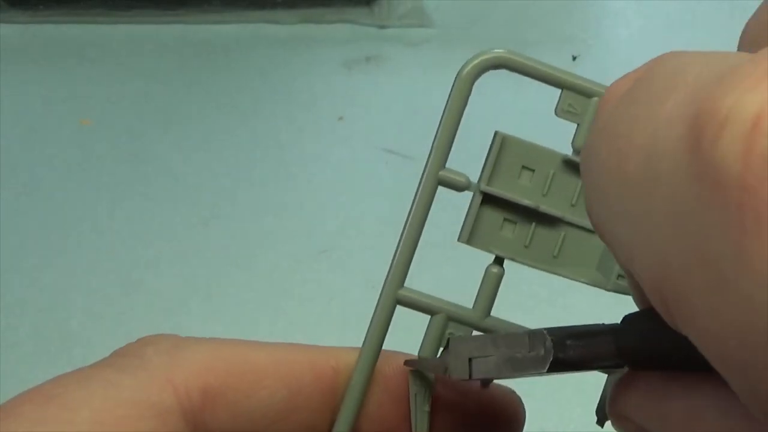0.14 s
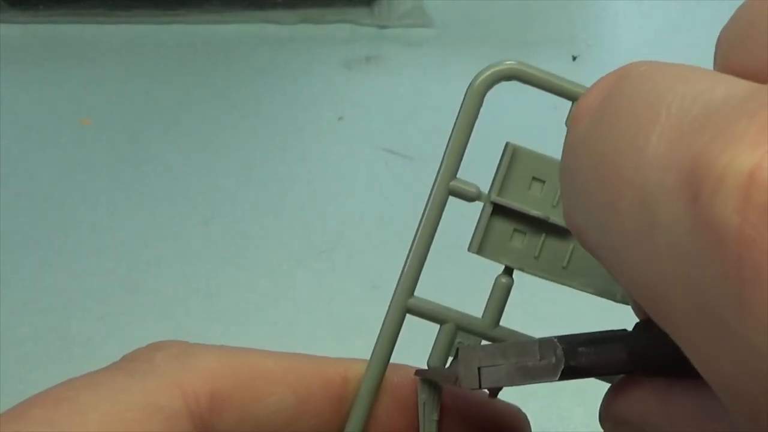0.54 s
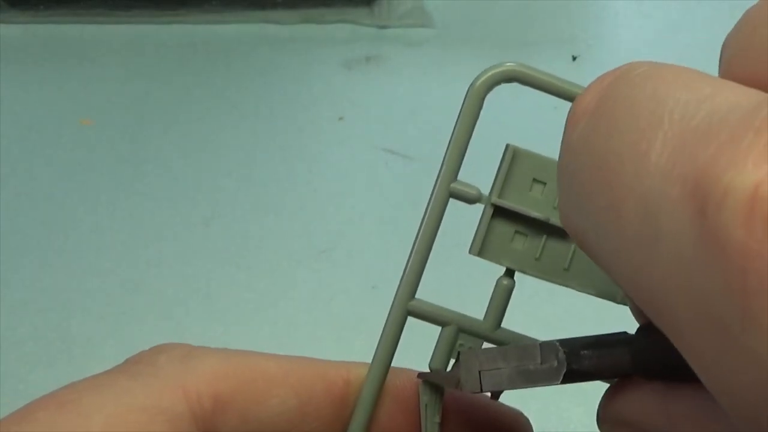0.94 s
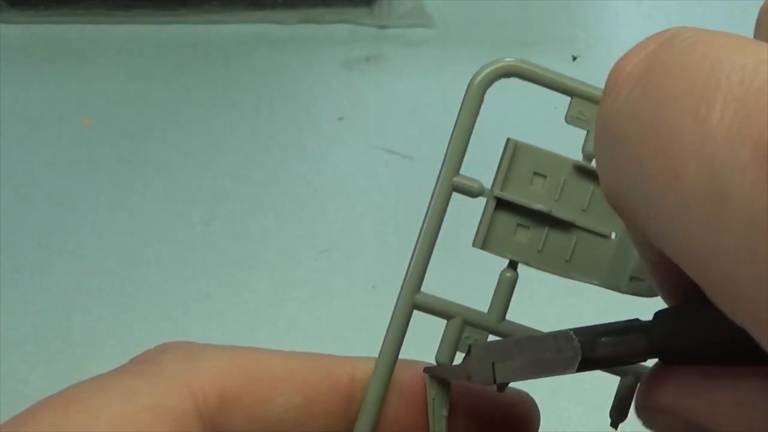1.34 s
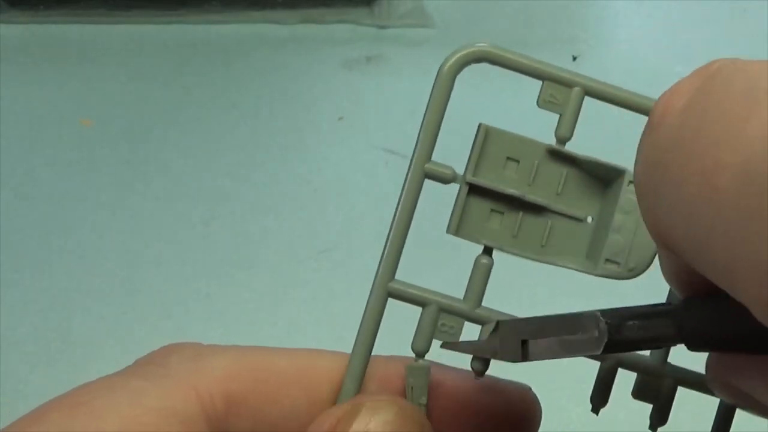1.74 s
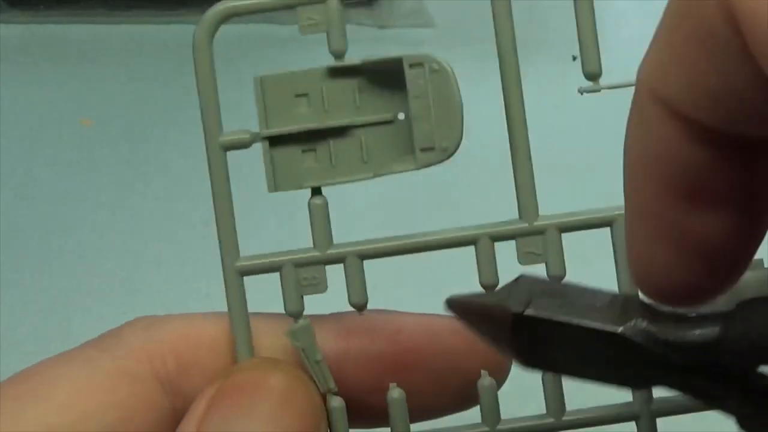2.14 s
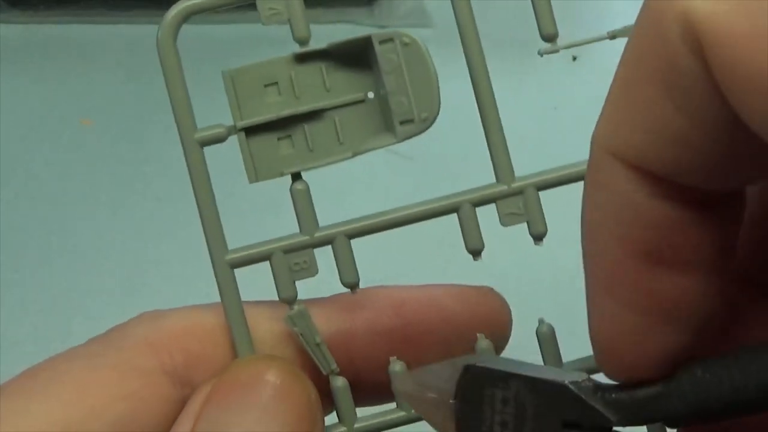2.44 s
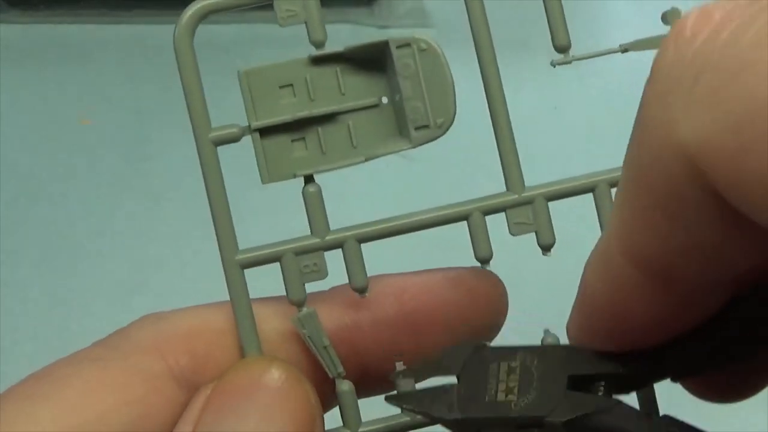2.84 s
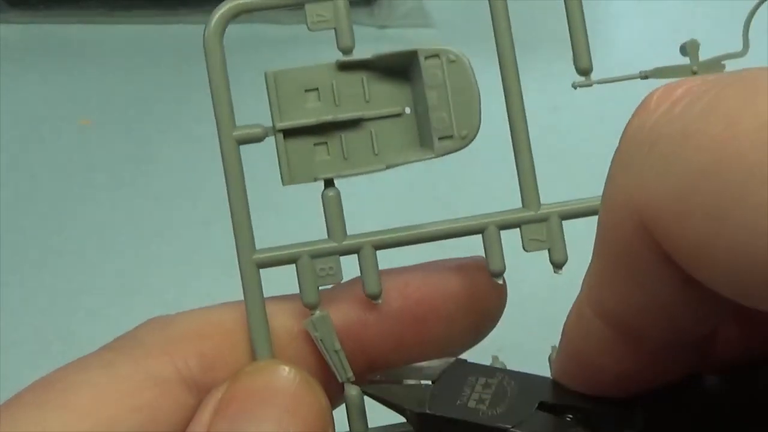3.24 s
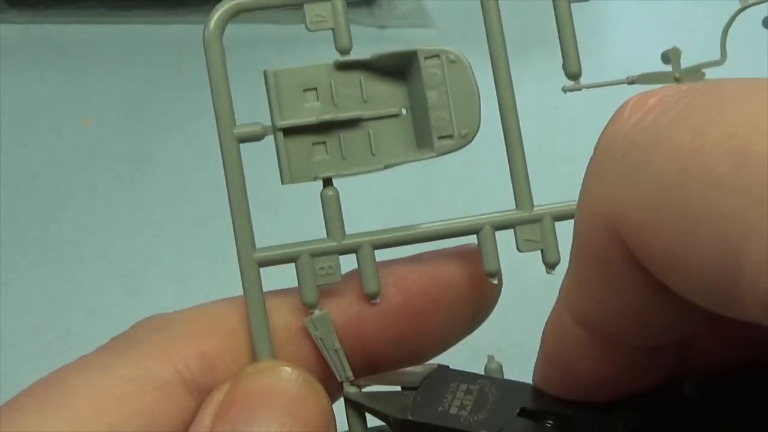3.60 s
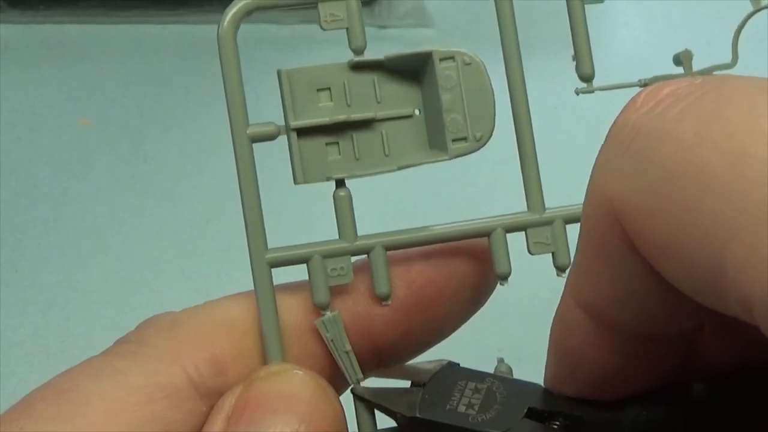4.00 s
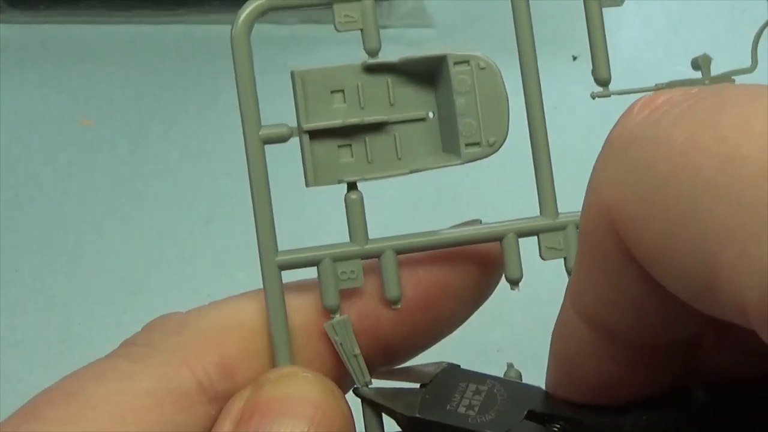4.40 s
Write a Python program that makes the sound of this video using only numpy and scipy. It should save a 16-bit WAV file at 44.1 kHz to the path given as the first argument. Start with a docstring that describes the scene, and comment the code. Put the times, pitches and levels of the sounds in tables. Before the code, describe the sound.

Close cutters crack thin plastic in hard bright clicks, then mostly quiet with light scrapes, a late small snap, faint motor pips and hiss.

```python
"""Side cutters snap the gates of a plastic model frame just in front of a camera in a quiet room.
Snaps are impulses and decaying noise through resonances; steel jaws tick as damped modes; scrapes and
finger rustle are fluctuating filtered noise; dull knocks are damped sines. A diffuse tail follows.
Underneath are the focus motor's tone pips, shaped hiss, a wandering low murmur and mains hum."""
import sys
import numpy as np
from scipy import signal
from scipy.fft import rfft, irfft
from scipy.io import wavfile
from scipy.ndimage import uniform_filter1d

SR = 44100
rng = np.random.default_rng(int(sys.argv[2]) if len(sys.argv) > 2 else 0)


def to_linear_factor(level_db):
    """Convert decibel levels (scalar or array-like) to linear amplitude factors."""
    exponent = np.asarray(level_db, float) / 20
    return 10 ** exponent


def dump(signal):
    """Clip the signal to [-1, 1] and save it as 16-bit WAV at the path in sys.argv[1]."""
    limited = np.clip(np.atleast_2d(signal).T, -1, 1)
    pcm = np.round(limited * 32767).astype(np.int16)
    wavfile.write(sys.argv[1], SR, pcm)


N = 201051
T = np.arange(N) / SR


def level(x, db):
    """Root-mean-square scaling: all rows together get the rms level db."""
    return x * to_linear_factor(db) / np.sqrt(np.mean(x ** 2))


def band(x, hz, width):
    """Two-pole resonance of the given bandwidth in Hz, with unit gain at its centre."""
    return signal.lfilter(*signal.iirpeak(hz, hz / width, SR), x)


def ring(force, modes, detune):
    """Modal superposition: each damped mode is a complex pole, a little off its pitch for this blow."""
    out = 0
    for (hz, db, t60), pitch_ratio in zip(modes, detune):
        decay = np.log(1000) / (t60 * SR)
        pole = np.exp(2j * np.pi * hz * pitch_ratio / SR - decay)
        out = out + to_linear_factor(db) * signal.lfilter([1], [1, -pole], force).imag
    return out


def fade(t, t60):
    """Exponential decay by 60 dB in t60 seconds."""
    return np.exp(-np.log(1000) * t / t60)


def colour(points):
    """Spectral shaping of white noise by (Hz, dB) points joined along log frequency."""
    hz, db = np.transpose(points)
    f = np.maximum(np.fft.rfftfreq(N, 1 / SR), 1)
    gain = to_linear_factor(np.interp(np.log(f), np.log(hz), db))
    return irfft(rfft(rng.standard_normal(N)) * gain, N)


def walk(rate):
    """Slow random modulation: values 1 / rate s apart joined by straight lines, rms about 0.67."""
    k = int(SR / rate)
    held = np.repeat(rng.standard_normal(N // k + 1), k)
    return 0.82 * uniform_filter1d(held, k)[:N]


def add(out, s, db, sound):
    """Superposition: adds a sound starting at s seconds, scaled to the peak db."""
    i = int(s * SR)
    out[i:i + len(sound)] += (sound * to_linear_factor(db) / np.abs(sound).max())[:N - i]


def clicks():
    """Impulsive fracture: a gate parts in a sharp step and a trail of grit, and the frame's modes ring on."""
    # snaps and knocks of the plastic:
    # [t/s, relative peak level/dB, bright centre f/Hz, body centre f/Hz, body re bright/dB, grit t60/s]
    snaps = [(.3510, -35.5, 7500, 1920, 25, 0.0075), (.9450, -28, 8060, 2190, -0.5, 0.02),
             (1.282, -46, 8400, 2300, -6.5, 0.015), (1.5488, -12, 7700, 1960, -15, 0.012),
             (1.5855, -31, 7700, 2900, 8, 0.027), (1.5967, -31.5, 7160, 3130, -3, 0.032),
             (1.651, -40, 6300, 1820, -7, 0.028), (1.6635, -48, 7520, 3090, -13, 0.012),
             (1.724, -23.5, 7300, 3200, -4, 0.015), (1.7733, -31.5, 7400, 2220, 14, 0.023),
             (1.7792, -22, 6960, 3050, -1, 0.011), (2.0004, -47, 8900, 3020, 0, 0.018),
             (2.0365, -46.5, 8600, 2950, -6, 0.036), (2.2029, -19.5, 8400, 3700, -13, 0.084),
             (2.2165, -11, 7900, 3700, -31, 0.012), (2.2185, -10.5, 7970, 3820, -11, 0.041),
             (2.3042, -23, 8130, 3500, -14, 0.036), (2.376, -31.5, 7930, 3840, -8, 0.038),
             (3.8285, -39, 7500, 3540, -13, 0.014), (3.8737, -42.5, 7860, 3040, -8.5, 0.023),
             (3.9385, -45, 6450, 1680, 14, 0.075), (3.9805, -45, 7150, 3400, 16, 0.0084),
             (4.118, -51, 8240, 2980, -19, 0.013), (4.4299, -31.5, 6700, 3970, -3, 0.027)]
    # modes of the plastic frame: [f/Hz, relative level/dB, t60/s]
    frame_modes = [(3300, -26.5, 0.038), (3700, -26, 0.078), (4480, -17, .03), (5030, -13, 0.017),
                   (5190, -7.5, 0.028), (6484, -8.5, 0.042), (6444, -11, 0.025), (6700, -14, 0.042),
                   (7700, -24, 0.024), (7440, -35, .05), (8020, 3.5, 0.0067), (8710, -13.5, 0.026),
                   (8950, -20.5, 0.013), (10090, -16.5, 0.034)]
    out, t = np.zeros(N), T[:SR // 5]
    for s, db, bright_hz, body_hz, body_db, t60 in snaps:
        noise = rng.standard_normal((2, len(t)))
        roughness = to_linear_factor(9 * uniform_filter1d(noise[1], size=16))
        grit = fade(t, t60) * noise[0] * roughness
        # the step scales with the total energy of the grit
        step = 1.5 * np.sqrt(np.sum(grit ** 2) / 10) * (t == 0)
        force = grit + step
        bright = level(band(band(force, bright_hz, 2500), bright_hz, 4900), 0)
        # the body has a peak where it was struck over a broad plateau of overlapping modes
        peak = band(force, body_hz, 0.3 * body_hz)
        plateau = to_linear_factor(-11) * band(force, 0.7 * body_hz, 1.9 * body_hz)
        body = level(peak + plateau, body_db)
        detune = 1 + 0.011 * noise[1, :len(frame_modes)]
        frame = level(ring(force, frame_modes, detune), -8)
        add(out, s, db, bright + body + frame)
    # thin plastic radiates almost no bass
    return signal.lfilter(*signal.butter(2, 500, "high", fs=SR), out)


def ticks():
    """Impact excitation: a hard, very short touch rings the steel; where it lands sets the lowest mode."""
    # light touches of the steel jaws: [t/s, relative peak level/dB, added gain of the lowest mode/dB]
    touches = [(0.3586, -42.5, -3), (0.4616, -44.5, 3), (0.809, -44, 1), (1.337, -41.5, 4.5),
               (1.4776, -38.5, -1), (1.4944, -62, 3), (2.6762, -41.5, 6), (2.69, -55, -6),
               (3.8106, -40.5, -5)]
    # modes of the steel jaws, lowest first: [f/Hz, relative level/dB, t60/s]
    jaw_modes = [(4174, -4.5, 0.062), (6910, 6.5, 0.074), (7190, 11, 0.034), (8640, 5.5, 0.031),
                 (9320, 7, 0.06)]
    out, t = np.zeros(N), T[:SR // 4]
    for s, db, low_db in touches:
        noise = rng.standard_normal(len(t))
        touch = (t == 0) + 0.054 * noise * fade(t, 0.0085)
        detune = 1 + 0.0024 * noise[-len(jaw_modes):]
        lowest = to_linear_factor(low_db) * ring(touch, jaw_modes[:1], detune)
        higher = ring(touch, jaw_modes[1:], detune[1:])
        add(out, s, db, lowest + higher + 0.53 * touch)
    return out


def scrapes():
    """Friction: uneven slips of the jaws excite now one bright resonance, now another, and the frame's body."""
    # jaws sliding on the frame: [t of the envelope's top/s, relative level/dB, swell/s, fade/s,
    # body re bright at the top/dB]
    slides = [(1.19, -67.5, .05, 0.054, -18), (1.391, -64, .04, .04, -1), (1.709, -55.5, 0.03, .015, -9),
              (1.748, -52, 0.027, .02, -12), (2.255, -54, 0.074, 0.088, -3.5),
              (2.821, -54.5, 0.052, .03, -23), (2.856, -43, 0.074, 0.051, -6.5),
              (3.825, -59.5, 0.029, 0.041, -11), (4.428, -48.5, 0.014, .015, -5.5),
              (4.455, -48.5, 0.022, 0.024, -3.5)]
    # resonances that the sliding rings: [f/Hz, bandwidth/Hz, relative level/dB]
    slide_modes = [(4670, 780, -10), (6600, 93, 6), (7760, 130, 10), (8400, 77, 12.5), (9900, 170, 4),
                   (10600, 67, -29)]
    slips = rng.standard_normal((2, N)) * to_linear_factor(1.97 * walk(400) + 3.2 * walk(120))
    bright = 0
    for hz, width, db in slide_modes:
        bright = bright + to_linear_factor(db + 2.4 * walk(29.96)) * band(slips[0], hz, width)
    bright = level(bright, 0)
    body = band(band(slips[1], 3800, 3000), 2950, 3920)
    body = body + 0.97 * band(slips[1], 1480, 120.3) + 0.5 * band(slips[1], 2520, 330)
    body = level(body, 0)
    out = np.zeros(N)
    for s, db, swell, fall, body_db in slides:
        # 1 at one swell before the top and at one fade after it, where the envelope is 25 dB down
        away = np.maximum((s - T) / swell, (T - s) / fall)
        envelope = to_linear_factor(db - 25 * np.minimum(away, 8) ** 1.17)
        # the body joins in by 195.5 dB per second as the slide goes on
        press = to_linear_factor(body_db + 195.5 * np.clip(T - s, -swell, fall))
        out = out + envelope * (bright + press * body)
    return out


def rustle():
    """Random friction: fingers shifting on the frame give noise in two treble bands, its level wavering."""
    # course of the rustle: [t/s, relative level/dB]
    course = [(0.0, -65.5), (0.8, -73.5), (1.3, -71), (1.7, -61), (2.05, -59), (2.25, -65.5), (2.8, -60.5),
              (2.92, -75.5), (3.2, -72), (4.56, -75.5)]
    noise = rng.standard_normal(N)
    skin = to_linear_factor(3.9 * walk(25)) * (band(noise, 7500, 3400) + 0.53 * band(noise, 8500, 490))
    return level(skin, -7) * to_linear_factor(np.interp(T, *np.transpose(course)))


def thumps():
    """Damped oscillation: each knock is one decaying sine, its onset softened by a broad resonance."""
    # dull knocks through hand and desk: [t/s, relative peak level/dB, f/Hz, t60/s]
    knocks = [(.945, -44.5, 243, 0.021), (1.585, -47, 750, 0.044), (1.607, -55.5, 346, 0.1),
              (1.723, -43.5, 934, 0.023), (1.779, -47, 770, 0.015), (2.218, -41.5, 396, 0.014),
              (2.25, -45.5, 2100, 0.065), (4.424, -55.5, 762, 0.24), (4.424, -56.5, 1410, .1),
              (4.452, -58, 2060, 0.19)]
    out, t = np.zeros(N), T[:SR // 6]
    for s, db, hz, t60 in knocks:
        swing = np.sin(2 * np.pi * hz * t) * fade(t, t60)
        add(out, s, db, band(swing, hz, 1.66 * hz))
    return out


def focus():
    """Pulsed tone: the lens steps once a picture frame, each pip rough, of its own strength, gliding up."""
    # spells of the focus motor: [start t/s, end t/s, f/Hz, relative level/dB, glide per picture frame/share of f]
    spells = [(0, 2.48, 3020, -66, .6), (2.48, 2.84, 2930, -64.5, .5), (4.0, 4.04, 2800, -64, .1),
              (4.08, 4.12, 2750, -64, .1), (4.16, 4.48, 2765, -63, .1), (4.52, 4.56, 2780, -63, .1)]
    first_pip_s, pips_per_s = 0.019, 25
    count = (T - first_pip_s) * pips_per_s + 0.5
    phase = count % 1 - 0.5  # 0 at the middle of each pip
    strength = to_linear_factor(1.1 * rng.standard_normal(int(count[-1]) + 1))[count.astype(int)]
    pip = np.exp(-(phase / 0.063) ** 2)
    tones = 0
    for start, end, hz, db, glide in spells:
        tone = np.sin(2 * np.pi * np.cumsum(hz * (1 + phase * glide)) / SR)
        tones = tones + to_linear_factor(db) * ((T >= start) & (T < end)) * tone
    roughness = to_linear_factor(1.5 * walk(280))
    return strength * pip * tones * roughness


def room(x):
    """Diffuse reverberation: a decaying noise tail, unrelated in mid and side, the treble dying first."""
    t = T[:SR // 2]
    noise = rng.standard_normal((2, len(t)))
    low = signal.lfilter(*signal.butter(1, 1100, fs=SR), noise)
    low_t60_s, high_t60_s, onset_s = 0.3, 0.06, 0.0043
    tail = to_linear_factor(6) * low * fade(t, low_t60_s) + (noise - low) * fade(t, high_t60_s)
    tail = tail * np.minimum(t / onset_s, 1)
    tail = tail / np.sqrt(np.sum(tail ** 2) / 2) * np.array([[1], [0.6]])
    return to_linear_factor(-7.5) * signal.fftconvolve(x[None], tail, axes=1)[:, :N]


def air():
    """Stationary random noise: the steady hiss of room and preamp as mid and side, each with its spectrum."""
    # spectrum of the mid: [f/Hz, relative spectral density/dB]
    air_mid = [(20, -25), (40, -3), (60, -7), (100, -13), (135, -3.5), (180, -7.5), (600, -14.5),
               (800, -14), (1200, -18), (7600, -24.5), (12000, -29.5)]
    # spectrum of the side re mid: [f/Hz, level/dB]
    air_side = [(30, -10), (125, -17), (300, 1), (700, 2), (2000, 4.5), (5000, 0.5), (10000, -3.5)]
    hz, db = np.transpose(air_mid)
    side_hz, side_db = np.transpose(air_side)
    mid = colour(air_mid)
    side = colour(np.c_[hz, db + np.interp(np.log(hz), np.log(side_hz), side_db)])
    return level(np.array([mid, side]), -66.5)


def murmur():
    """Band-limited noise: a low room murmur whose level wanders slowly, weaker in the side than in the mid."""
    low = np.array([band(rng.standard_normal(N), 240, 690) for _ in range(2)])
    return np.array([[1], [0.4]]) * level(low, -72.5) * to_linear_factor(-1.5 * walk(0.75))


def hum():
    """Harmonic series of the mains, in the mid only: the higher the harmonic, the more its level wavers."""
    # mains harmonics: [f/Hz, relative level/dB]
    harmonics = [(50, -74.5), (150, -74.5), (250, -78.5), (350, -86.5)]
    out = 0
    for hz, db in harmonics:
        waver = to_linear_factor(db + 4 + hz / 70 * walk(20))
        out = out + waver * np.sin(2 * np.pi * (hz * T + rng.random()))
    return out * np.array([[1], [0]])


def scene():
    """Mid-side superposition: hands and tool are straight ahead, the motor inside the camera."""
    near = clicks() + ticks() + scrapes() + rustle()
    mid, side = room(near) + air() + murmur() + hum()
    mid = mid + near + thumps() + focus()
    return np.array([to_linear_factor(2.6) * mid + side, to_linear_factor(3.0) * mid - side])


def roll_off(x):
    """The treble ends steeply here."""
    return signal.sosfilt(signal.butter(12, 16460, fs=SR, output="sos"), x)


def record(dry):
    """Low-pass filtering, then nonlinear distortion: overdrive smears the sharpest peaks above the cut."""
    top_cut = signal.ellip(10, 0.1, 60, 11050, fs=SR, output="sos")
    kept = signal.sosfiltfilt(top_cut, dry)
    above_cut = signal.ellip(8, 0.1, 60, [11000, 16200], "band", fs=SR, output="sos")
    # the product grows with the square of the signal, so quiet sounds add almost nothing
    overdrive = signal.sosfilt(above_cut, 0.71 * kept * np.abs(kept))
    return roll_off(kept + overdrive)


dry = scene()
out = record(dry)
dump(out)
```